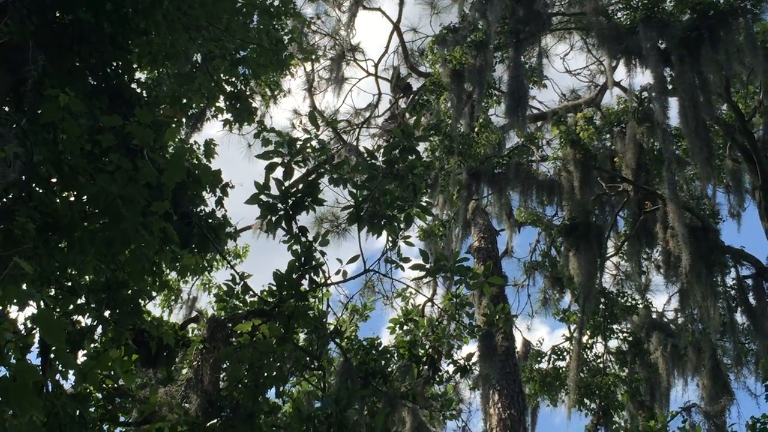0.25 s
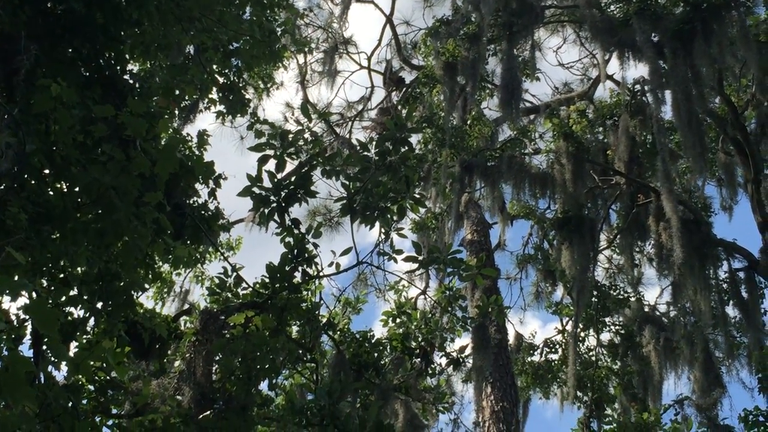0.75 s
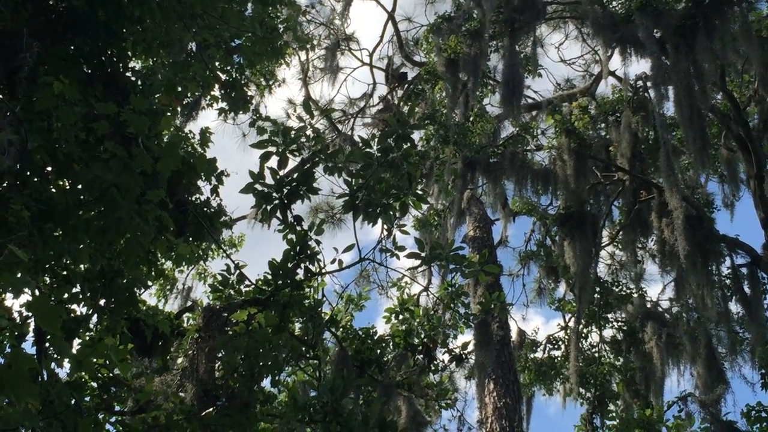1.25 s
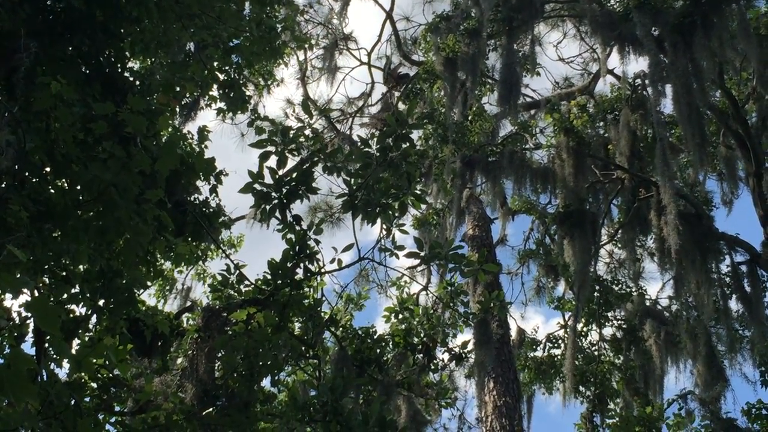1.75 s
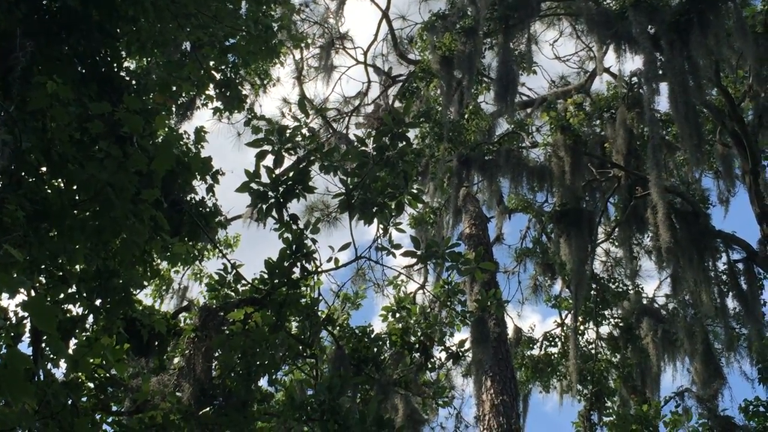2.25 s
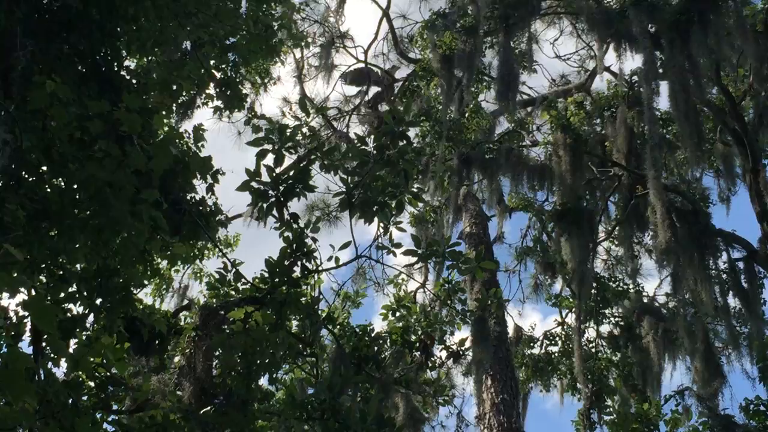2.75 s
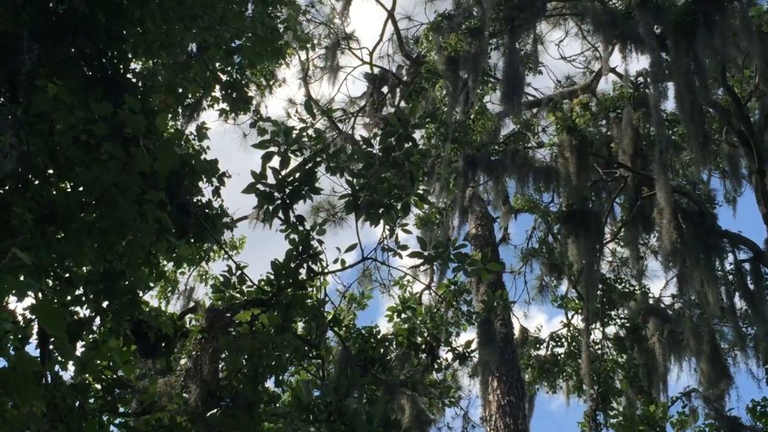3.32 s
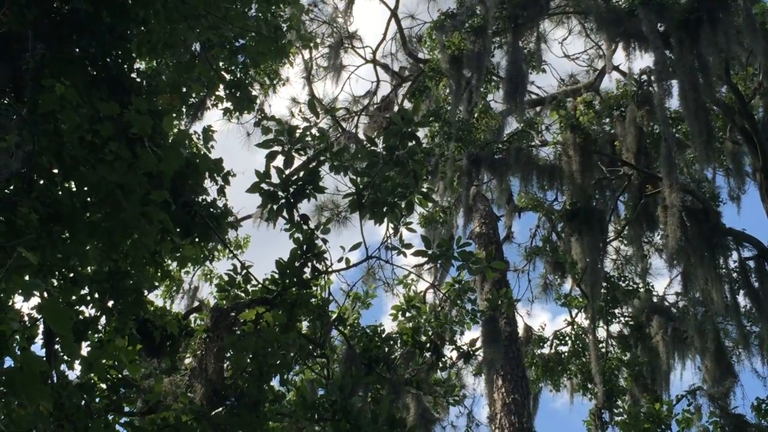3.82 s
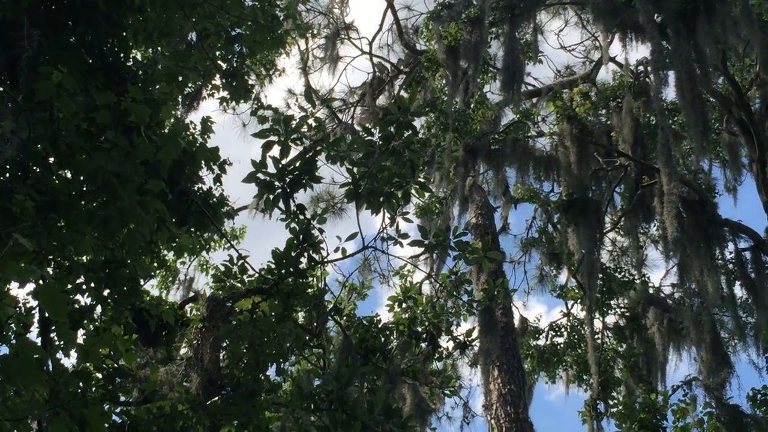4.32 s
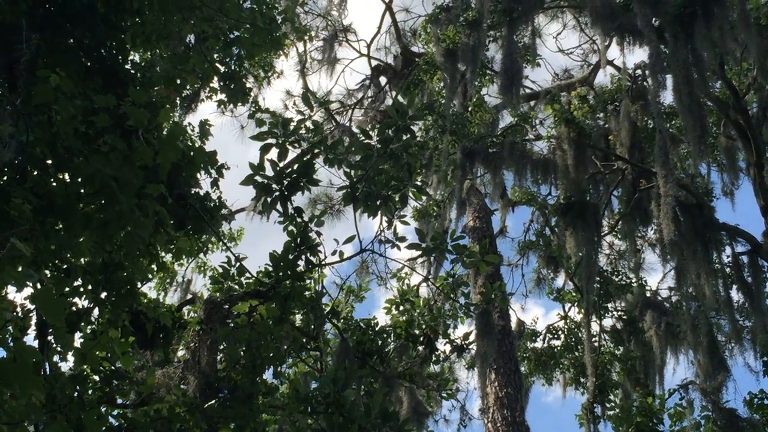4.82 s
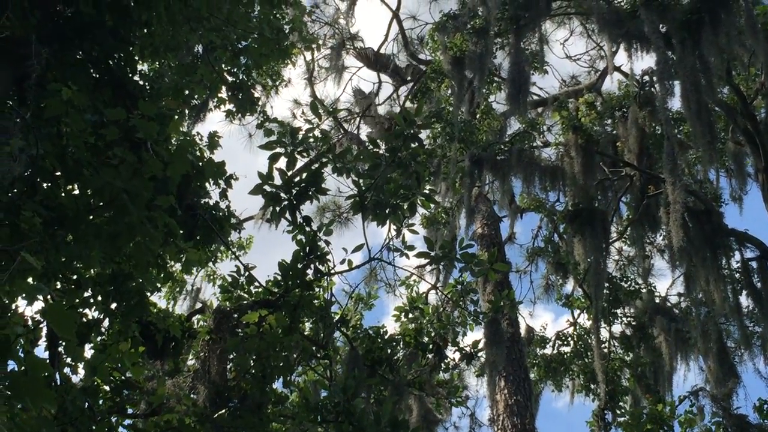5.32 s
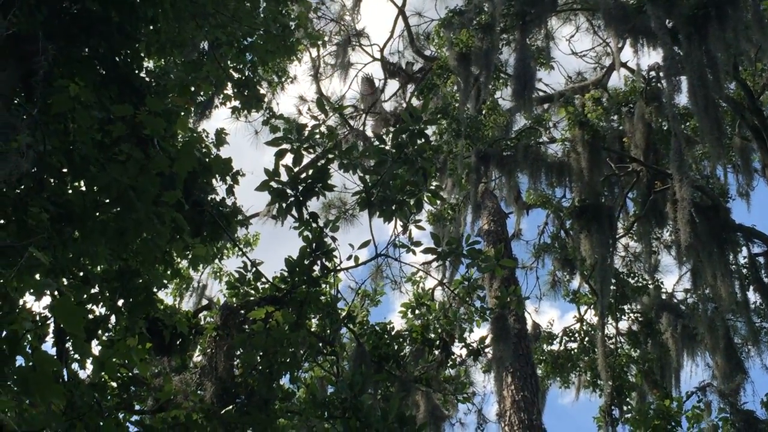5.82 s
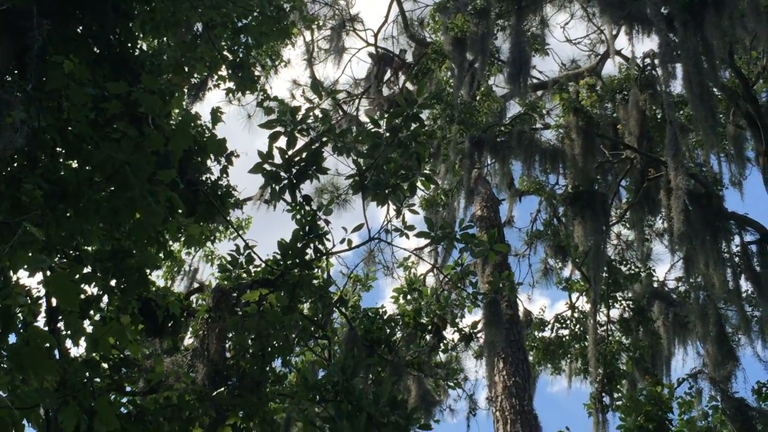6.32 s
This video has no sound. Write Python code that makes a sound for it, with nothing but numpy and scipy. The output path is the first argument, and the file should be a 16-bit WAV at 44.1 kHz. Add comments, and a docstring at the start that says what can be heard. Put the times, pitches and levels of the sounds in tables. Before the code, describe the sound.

Heron chicks beg from a nest high in a pine, heard in mono outdoors. From 0.1 to 1.9 s one chick gives a harsh, rough kek-kek-kek, some eight short bursts a second, strengthening toward the middle, while a softer sibling rasps in between. At 2 s the rattle stops; thin, nearly closed-beak whining rasps follow, quieter, with hollow yelps around 2.6 to 2.75 and 3.0 s. From 3.1 to 4.9 s long hoarse rasps surge and widen into bright hiss, with a strong yelp at 4.0 s. Shorter rasps and faint yelps near 5.3 s lead to a weaker, blurrier kek series from 5.7 s, overlapping hoarse rasps, and a higher, loud yelp at 6.56 s as it cuts off. Faint wing swishes touch leaves after 2 s. Trees add light echoes; beneath lie quiet air, low rumble and, mostly after 4 s, a wavering distant engine hum.

```python
"""A fast harsh "kek-kek-kek" opens, a softer sibling rasp between: heron chicks beg in a nest high in a pine.
It gives way to long hissing rasps and a few hollow yelps, then starts again.
Each voice is rough membrane pulses and air, or a wavering tone and noise, shaped by throat resonances.
Wings brush the foliage as grainy noise and the trees scatter the calls as echoes and a faint tail.
Underneath lie filtered-noise air, a distant rumble and the wavering hum of a far engine."""
import sys
import numpy as np
from scipy import signal
from scipy.fft import rfft, irfft
from scipy.io import wavfile
from scipy.ndimage import uniform_filter1d, map_coordinates

SR = 44100
rng = np.random.default_rng(int(sys.argv[2]) if len(sys.argv) > 2 else 0)


def wrap_up_sound(samples):
    """Save the sound to the file named by the first command line argument, as 16-bit audio."""
    columns = np.atleast_2d(samples).T
    # keep every value between -1 and 1, then stretch to whole-number steps
    tamed = np.clip(columns, -1, 1)
    steps = np.round(tamed * 32767).astype(np.int16)
    wavfile.write(sys.argv[1], SR, steps)


N = 289737
T = np.arange(N) / SR  # time [s]

# one row a kek: (peak time [s], level [dB], rise [s], fall [s], beak resonance [Hz], brightness [dB/octave])
KEK_CALLS = [(0.104, -41, 0.022, 0.036, 1370, -2.5), (0.234, -39.5, 0.023, 0.03, 1380, -0.9),
             (0.38, -40, 0.019, 0.015, 1610, -1.5), (0.499, -36.5, 0.026, 0.018, 3130, -2),
             (0.622, -36, 0.013, 0.025, 1150, 0.5), (0.753, -35.5, 0.022, 0.032, 1220, 0.6),
             (0.884, -34, 0.03, 0.021, 2050.0, 0.9), (1.016, -36.5, 0.029, 0.019, 2070, -1),
             (1.142, -35.5, 0.032, 0.022, 2200, 0.5), (1.259, -36, 0.022, 0.029, 1070, 2),
             (1.399, -36, 0.034, 0.029, 1580, 0.5), (1.513, -35, 0.015, 0.053, 1580, 0.8),
             (1.655, -36, 0.015, 0.029, 1780, -1.5), (1.773, -33.5, 0.0086, 0.024, 1590, 0.5),
             (1.919, -38.5, 0.026, 0.027, 1780, 0.5), (5.728, -43, 0.0055, 0.045, 1120.0, 3),
             (5.839, -37.5, 0.024, 0.034, 1270, 1.5), (5.954, -41, 0.036, 0.025, 1130, 0),
             (6.068, -39.5, 0.036, 0.02, 2600, -2), (6.179, -42, 0.071, 0.11, 1160, -6),
             (6.29, -43, 0.046, 0.013, 2580.0, -4.5), (6.384, -43.5, 0.017, 0.12, 1060, -5),
             (6.507, -43.5, 0.019, 0.028, 1140, 2.5)]
# wide-open throat of the keks, relative gain: (frequency [Hz], gain [dB])
KEK_THROAT_GAIN = [(500, -31), (700, 1.5), (1060, -3), (1300, -1), (1600, -5.5), (2050, 0), (2390, -7),
                   (2650, -1), (3550, -6), (4750, -23.5), (5600, -31), (7700, -43.5), (11000, -48.5)]

# one row a drawn-out rasp: (start [s], end [s], level halfway [dB], growth [dB], lowest resonance at start [Hz],
# at end [Hz], second resonance halfway [Hz], its blur [0-1], beak band at half gape [dB],
# hiss at half gape [dB], gape at start [0-1], gape at end [0-1]); surges add to some of these
RASP_CALLS = [(1.995, 2.051, -49.5, -2.5, 1046, 1070, 2260, .02, -4.5, -32, 0, .05),
              (2.068, 2.173, -52, -6.5, 1130, 1176, 2370, 0.1, -0.5, -23, 0.12, 0.026),
              (2.191, 2.39, -53.5, 5.5, 1050, 1168, 2396, 0.18, -0.5, -30, 0.1, 0.25),
              (2.41, 2.64, -60.5, 1, 1164, 1210, 2310, 0.3, -5.5, -20, 0.37, .25),
              (2.997, 3.098, -60.5, 8, 1020, 976, 2740, .55, -2.5, -25, 0.25, 0.47),
              (3.1, 3.433, -51, -0.5, 1011, 1102, 2460, 0.77, -4.5, -24, .62, 0.69),
              (3.493, 3.662, -48, -2, 968, 1145, 2140, 0.45, -6.5, -27, 0.57, 0.023),
              (3.665, 4.063, -52, 4, 1007, 1166, 2147, 0.12, 0, -14.5, 0.31, 0.37),
              (4.075, 4.324, -53.5, 1.5, 1044, 1066, 2106, 0.08, 0, -19.5, 0.37, 0.74),
              (4.3, 4.66, -53, 6.5, 1070, 1097, 2154, .3, -10.5, -20.5, 0.69, 0.9),
              (4.663, 4.922, -47, 2, 1080, 1097, 2250, 0.7, -6.5, -16.5, 0.8, 0.54),
              (5.016, 5.242, -54, 0.5, 1066, 970, 2650, 0.54, -4.5, -23, 0.2, 0.24),
              (5.318, 5.482, -56, -3.5, 923, 900, 2530, 0.17, -11.5, -28, 0.13, 0.55),
              (5.502, 5.625, -55, 1.5, 880, 977, 2530, 0.2, -5.5, -32, 0.66, 0.35),
              (5.614, 5.896, -51.5, 0.5, 960, 1074, 1970, 0.16, -8, -39, 0.82, 0.78),
              (5.905, 6.033, -44, 0.5, 1060, 1060, 2450, 0.86, -0.5, -16.5, 0.36, 0.4),
              (6.149, 6.574, -48.5, 2.5, 972, 1000, 2190, 0.75, -3.5, -19, 0.64, .15)]
# a chick strains differently within a rasp: (start [s], end [s], extra effort [dB], extra gape [0-1],
# shift of the lowest resonance [Hz])
STRAIN_SURGES = [(2.344, 2.402, -2.5, 0.36, 2), (3.305, 3.394, 11, 0.04, 67), (3.847, 3.889, 3, 0.23, 30),
                 (3.926, 3.98, -1.5, 0.36, -5), (3.98, 4.072, 5, 0.05, -85), (4.177, 4.256, 1, 0.04, -3),
                 (6.28, 6.407, 5.5, 0, -19)]
# the neck stretches and draws back, sliding the upper resonances:
# (time [s], third resonance [Hz], fourth [Hz], fifth [Hz])
NECK_RESONANCES = [(2.0, 3080, 4100, 5300), (2.39, 3490, 4300, 5500), (3.06, 3180, 4020, 5030),
                   (3.38, 3420, 4270, 5540), (3.62, 3100, 4030, 5330), (3.83, 3650, 4500, 5500),
                   (4.04, 3570, 3960, 5540), (4.24, 3480, 4540, 6080), (4.36, 3520, 4380, 5700),
                   (4.48, 3660, 4720, 5750), (4.68, 3614, 4510, 5870), (4.92, 3670, 4500, 4920),
                   (5.1, 3200, 3930, 6100), (5.76, 3064, 3790, 5150), (6.1, 3125, 3980, 4930),
                   (6.57, 3180, 4680, 6200)]

# soft rasps of a sibling: (start [s], end [s], level [dB])
SIBLING_CALLS = [(-.05, -0.005, -44.5), (0.326, 0.45, -52), (0.53, 0.785, -52.5), (0.897, 1.28, -52.5),
                 (1.44, 1.596, -51.5), (1.688, 1.867, -50.5)]
# the sibling's throat resonances before drift: (centre [Hz], width of one filter stage [Hz], relative level [dB])
SIBLING_RESONANCES = [(1033, 490, 9), (1283, 800, 8), (1800, 350, 0.5), (2390, 520, 3.5), (3000, 510, 2.5),
                      (3840, 1300, -3.5), (5980, 1400, -16)]

# hollow yelps: (peak time [s], level [dB], rise before a 1.26 stretch [s], fall [s], pitch at the peak [Hz],
# overtone at the peak [Hz], overtone relative to the pitch [dB], roughness [0-1])
YELP_CALLS = [(2.592, -46, 0.0037, 0.013, 966, 2270, -21, 0.65),
              (2.718, -53.5, .006, 0.018, 960, 1890, -10, 0.4),
              (2.742, -45.5, 0.0078, 0.018, 985, 1954, -8.5, 0.34),
              (2.976, -42.5, 0.025, 0.017, 1009, 3150, -6.5, 0.38),
              (3.993, -40, 0.0079, 0.013, 983, 2160, -21, 0.4),
              (5.281, -51.5, 0.0065, 0.035, 950, 1420, -19, 0),
              (5.324, -49.5, 0.0045, 0.019, 900, 1386, -14, 0.1),
              (6.562, -36.5, 0.012, .03, 1193, 2950, -21, 0.34)]

# wings brushing twigs and leaves: (peak time [s], level [dB], rise [s], fall [s])
WING_BRUSHES = [(2.15, -72, 0.035, .03), (2.999, -55.5, 0.011, 0.016), (3.38, -62.5, 0.07, .06),
                (3.87, -63.5, 0.023, 0.046), (4.323, -62, .006, 0.0065), (4.72, -64, 0.026, 0.055),
                (4.89, -63, 0.075, 0.074), (5.12, -68, 0.069, 0.063), (5.52, -69.5, 0.065, 0.17)]
# colour of the rustling leaves, relative gain: (frequency [Hz], gain [dB])
LEAF_GAIN = [(1500, 7), (3500, 2), (6000, 2), (9000, -2.5), (15000, -15)]

# how long the trees ring: (frequency [Hz], time to fall 60 dB [s])
WOODS_DECAY = [(300, 0.45), (1000, 0.48), (3000, 0.57), (8000, 0.37)]

# colour of the outdoor air, relative gain: (frequency [Hz], gain [dB])
AIR_GAIN = [(20, -43), (40, -15), (65, 2.5), (100, -1), (150, -5), (300, -7.5), (500, -11.5), (1000, -10.5),
            (2000, -15.5), (4500, -25.5), (8000, -29), (10500, -32), (15500, -32.5)]
# distant rumble: (time [s], level before trim and lumps [dB])
RUMBLE_LEVEL = [(0, -70), (.42, -77), (.53, -59), (.7, -63.5), (1.4, -67), (1.65, -73), (3.2, -67.5),
                (4.15, -64.5), (4.9, -67), (6.57, -67.5)]
# hum of a far engine: (time [s], level before wavering [dB])
HUM_LEVEL = [(0, -85), (3.6, -79), (4.1, -65.5), (5.0, -63), (5.7, -64.5), (6.1, -77), (6.57, -65)]

RASP_ATTACK_S, RASP_RELEASE_S = 0.023, 0.023
SURGE_ATTACK_S, SURGE_RELEASE_S = 0.015, 0.02
# what an opening beak does, from shut to wide open
EDGE_SHUT_DB, EDGE_OPENING_DB, BEAK_OPENING_DB, HISS_OPENING_DB = -27.5, 30, 6, 14.5
SPREAD_SHUT_HZ, SPREAD_OPENING_HZ, SPREAD_STRAIN_HZ = 88, 106, 64  # gap between the lowest pair of resonances
STRAIN_DULLING_DB = -3.5  # straining feeds the lowest resonances more than the upper ones
SECOND_GLIDE = 0.57  # how much of the lowest resonance's glide the second follows (exponent)
WHINE_DB, WHINE_WIDTH_HZ = 2, 180  # a relaxed, nearly shut beak narrows the rasp to a whine
EDGE_HZ = 15700  # upper band limit


def keks(beak_db=6, beak_width_hz=300, pulse_hz=235, spit_db=-30):
    """Short rattling bursts through a wide-open throat, each with its own beak resonance."""
    source = syrinx(pulse_hz, jitter=.22, uneven_db=3, air=.6)
    source = windpipe(source, 560 * np.exp(.15 * wander(9)), echo=.45)
    throat = colour(source, lambda hz: read(KEK_THROAT_GAIN, hz))
    drive = band(throat, 853, 11700, order=4)
    spit = steady(formant(source, 5750, 1300))
    out = np.zeros(N)
    for s, db, rise, fall, beak_hz, bright in KEK_CALLS:
        def beak_gain(hz):
            """A beak peak on a spectral tilt, in dB."""
            peak = beak_db / (1 + ((hz - beak_hz) / beak_width_hz) ** 2)
            return peak + bright * np.log2(np.clip(hz, 900, 3800) / beak_hz)

        near = (T > s - .1) & (T < s + .2)
        voice = steady(colour(drive[near], beak_gain))
        force = swell(T[near] - s, rise, fall)
        # spit carries force twice, so it shows mainly at full force; brighter keks spit more
        out[near] += amp(db) * force * (voice + amp(spit_db + bright) * force * spit[near])
    return out


def rasp(flutter_db=1, croak_db=-3, pulse_hz=300):
    """A hoarse hiss through gliding resonances; effort adds a croak underneath, an open beak brightens it."""
    effort, first, second, blur, beak, hiss, gape = gestures()
    third, fourth, fifth = curves(NECK_RESONANCES)
    source = syrinx(pulse_hz, jitter=.3, uneven_db=3, air=.7)
    drive = windpipe(source, third / 7 * (1 + .025 * wander(12)), echo=.58)
    strain = np.clip((effort + 52) / 12, 0, 1)  # starts at -52 dB, full at -40 dB

    # lowest pair of resonances, with whine and croak
    spread = SPREAD_SHUT_HZ + SPREAD_OPENING_HZ * gape + SPREAD_STRAIN_HZ * strain
    pair = formant(source, first - spread / 2, 276) + 0.88 * formant(drive, first + spread / 2, 418)
    whine = amp(WHINE_DB) * (1 - gape) * (1 - strain) * formant(source, first, WHINE_WIDTH_HZ)
    croak = amp(croak_db) * strain * formant(source, 824, 210)
    low = steady(pair + whine + croak)

    # beak band: clear or blurred, with a lower companion as the beak opens
    clear = formant(source, second, 420)
    blurred = unit(band(resonate(drive, second, 3000), 2080, 3240, order=4))
    companion = formant(source, 0.7925 * second, 440)
    middle = steady((1 - blur) * clear + blur * blurred + 0.55 * gape * companion)

    # bright edge and hiss
    upper = steady(formant(drive, third, 1020) + .5 * formant(source, fourth, 610))
    wide_hiss = unit(band(formant(drive, fifth, 4940), 2200, 14000))
    top = steady(0.85 * formant(source, fifth, 640) + wide_hiss)

    overtones = ((middle, beak + BEAK_OPENING_DB * (gape - .5)),
                 (upper, EDGE_SHUT_DB + EDGE_OPENING_DB * gape),
                 (top, hiss + HISS_OPENING_DB * (gape - .5)))
    bright = sum(part * amp(db + flutter_db * wander(32) / 2) for part, db in overtones)
    voice = low + amp(STRAIN_DULLING_DB * strain) * bright
    return voice * amp(effort + flutter_db * wander(30))


def gestures():
    """Each rasp grows, glides and moves the beak evenly; the throat blends smoothly from rasp to rasp."""
    power, weights, shape = 0, 0, 0
    for (start, end, db, growth_db, from_hz, to_hz, second, blur, beak, hiss,
         gape_from, gape_to) in RASP_CALLS:
        along = np.clip((T - start) / (end - start), 0, 1)
        weight = hold(start, end, RASP_ATTACK_S, RASP_RELEASE_S) ** 2 + 1e-20
        first = from_hz + (to_hz - from_hz) * along
        glide = (2 * first / (from_hz + to_hz)) ** SECOND_GLIDE
        gape = gape_from + (gape_to - gape_from) * along
        power = power + weight * amp(db + growth_db * (along - .5)) ** 2
        pose = first, second * glide, blur, beak, hiss, gape
        shape = shape + np.array([weight * p for p in pose])
        weights = weights + weight
    effort = 10 * np.log10(power)
    first, second, blur, beak, hiss, gape = shape / weights
    for start, end, extra_db, wider, shift_hz in STRAIN_SURGES:
        push = hold(start, end, SURGE_ATTACK_S, SURGE_RELEASE_S)
        effort = effort + extra_db * push
        first = first + shift_hz * push
        gape = gape + wider * push
        blur = blur + wider * push / 2
    return effort, first, second, np.clip(blur, 0, 1), beak, hiss, np.clip(gape, 0, 1)


def sibling(attack_s=0.014, release_s=0.019):
    """A softer rasp: rough pulses and air through throat resonances that drift together."""
    drive = syrinx(pulse_hz=296.0, jitter=.3, uneven_db=3, air=0.9)
    drift = 1 + 0.042 * wander(4)
    voice = sum(amp(db) * formant(drive, hz * drift, width, flutter_db=3)
                for hz, width, db in SIBLING_RESONANCES)
    level = sum(amp(db) * hold(start, end, attack_s, release_s) for start, end, db in SIBLING_CALLS)
    return steady(voice) * level


def yelps(waver=0.0249, width_hz=750, sag=.6):
    """A wavering, sagging note with one strong overtone, edged with hoarse noise."""
    out = np.zeros(N)
    bend = waver * wander(93.8)
    air = rng.standard_normal(N)
    for s, db, rise, fall, hz, over_hz, over_db, rough in YELP_CALLS:
        opening = np.clip((T - s + 1.55 * rise) / 0.0044, 0, 1)  # the note catches abruptly
        envelope = opening * swell(T - s, 1.26 * rise, fall)
        glide = hz * (bend - sag * np.clip(T - s, -.1, .1))  # same shift in Hz for note and overtone
        for f, gain in ((hz, 1), (over_hz, amp(over_db))):
            line = np.sqrt(2) * np.sin(2 * np.pi * np.cumsum(f + glide) / SR)
            hoarse = unit(resonate(air, f, width_hz, order=4))
            out += amp(db) * gain * unit((1 - rough) * line + rough * hoarse) * envelope
    return out


def wings():
    """Feathers sweep over leaves in grainy swishes: noise with a fast random level, coloured."""
    grains = rng.standard_normal(N) * amp(3.5 * wander(550))
    rustle = unit(colour(grains, lambda hz: read(LEAF_GAIN, hz)))
    return rustle * sum(amp(db) * swell(T - s, rise, fall) for s, db, rise, fall in WING_BRUSHES)


def woods(x, wet_db=-17, twigs_db=-9):
    """Near branches give a few quick echoes, the trees around a faint tail that decays by frequency."""
    t = np.arange(SR // 2) / SR
    taps = rng.standard_normal(len(t)) * (rng.random(len(t)) < 2000 / SR) * (t > .012)
    hz, s, z = signal.stft(taps, SR, nperseg=256)
    decay = amp(-60 * s / read(WOODS_DECAY, hz)[:, None])
    tail = signal.istft(z * decay, SR, nperseg=256)[1]
    echo = amp(wet_db) * tail / np.linalg.norm(tail)
    at = rng.uniform(0.001955, .014, size=8)  # branch delays [s]
    echo[(at * SR).astype(int)] += amp(twigs_db) * rng.choice([-1, 1], len(at)) / np.sqrt(len(at))
    return x + signal.fftconvolve(x, echo)[:N]


def background(air_db=-66, rumble_db=-1, lumps_db=2):
    """Still outdoor air and a lumpy low rumble from filtered noise; a far engine as a wavering sine."""
    air = amp(air_db) * unit(colour(rng.standard_normal(N), lambda hz: read(AIR_GAIN, hz)))
    rumble_level = amp(curves(RUMBLE_LEVEL)[0] + rumble_db + lumps_db * wander(28))
    rumble = rumble_level * unit(band(rng.standard_normal(N), 50.7, 90, order=2))
    hum = np.sqrt(2) * np.sin(2 * np.pi * np.cumsum(98 + 0.9 * wander(5.9)) / SR)
    return air + rumble + hum * amp(curves(HUM_LEVEL)[0] + 2 * wander(4.2))


def syrinx(pulse_hz, jitter, uneven_db, air):
    """Irregular slaps of the membranes, mixed with turbulent air."""
    turns = np.cumsum(pulse_hz * np.exp(jitter * wander(pulse_hz / 2))) / SR
    strength = amp(uneven_db * np.clip(rng.standard_normal(N), -2, 1))
    slaps = np.diff(np.floor(turns), prepend=0) * strength  # one slap per whole turn
    return unit(air * rng.standard_normal(N) - unit(slaps))


def windpipe(x, spacing_hz, echo):
    """Sound runs up and down the long neck: a ladder of resonances that slides as it stretches."""
    trip, at = SR / spacing_hz, np.arange(N)  # round trip [samples]
    echo = np.clip(echo, 0, .8)
    return unit(sum(echo ** k * map_coordinates(x, [at - k * trip], order=3) for k in range(4)))


def formant(drive, hz, width_hz, flutter_db=2):
    """One steep throat resonance that quivers in pitch and strength."""
    ring = resonate(drive, hz * (1 + .014 * wander(22)), width_hz, order=5)
    return unit(ring * amp(flutter_db * wander(18)))


def resonate(x, hz, width_hz, order=2):
    """A steep resonance of gain 1 that follows hz; width_hz is that of one filter stage."""
    turn = np.exp(2j * np.pi * np.cumsum(hz * np.ones(N)) / SR)
    r = np.exp(-np.pi * width_hz / SR)
    z = x / turn  # shift hz down to zero, smooth there, shift back
    for _ in range(order):
        z = signal.lfilter([1 - r], [1, -r], z)
    return 2 * (turn * z).real


def swell(t, rise, fall):
    """A rounded rise from a firm start to t = 0, then an exponential fall."""
    return np.exp(-np.where(t < 0, abs(t / rise) ** 2.5, t / fall))


def hold(start, end, attack_s, release_s):
    """Smooth attack, level hold, exponential release."""
    rise = np.sin(np.pi / 2 * np.clip((T - start) / attack_s, 0, 1))
    return rise * np.exp(-np.clip((T - end) / release_s, 0, 20))


def steady(x):
    """Holds the rms at 1 over some 30 ms, keeping the faster grain."""
    return x / np.sqrt(uniform_filter1d(x ** 2, size=1400) + 1e-20)


def wander(hz):
    """Slow random curve of rms 1, from noise smoothed above about hz."""
    smoothing = np.exp(-(np.fft.rfftfreq(N, 1 / SR) / hz) ** 2)
    return unit(irfft(rfft(rng.standard_normal(N)) * smoothing, N))


def colour(x, gain_db):
    """Causal minimum-phase filter with the gain gain_db(hz)."""
    hz = abs(np.fft.fftfreq(4096, 1 / SR))
    log_gain = np.log(amp(np.maximum(gain_db(hz), -90)))
    taps = np.fft.ifft(np.exp(np.conj(signal.hilbert(log_gain)))).real
    return signal.oaconvolve(x, taps[:len(taps) // 2])[:len(x)]


def band(x, lo_hz, hi_hz, order=3):
    """Band-pass."""
    edges = [lo_hz, min(hi_hz, SR / 2 - 1)]
    return signal.sosfilt(signal.butter(order, edges, "band", fs=SR, output="sos"), x)


def read(points, hz):
    """Reads a spectrum table on a log-frequency axis."""
    f, value = np.transpose(points)
    return np.interp(np.log(hz + 1), np.log(f + 1), value)


def curves(rows):
    """Each column of a table after the time, sample by sample."""
    s, *columns = np.transpose(rows)
    return [np.interp(T, s, c) for c in columns]


def amp(db):
    """Decibels to gain."""
    return 10 ** (np.asarray(db) / 20)


def unit(x):
    """Scales to rms 1."""
    return x / np.sqrt(np.mean(x ** 2) + 1e-20)


def scene():
    """Chicks and wings scattered by the trees, over the background; one channel."""
    nest = keks() + rasp() + sibling() + yelps() + wings()
    return (woods(nest) + background())[None]


def record(dry):
    """The recorder's band limit, after 2 ms fades at both ends."""
    edges = np.clip(np.minimum(T, T[-1] - T) / .002, 0, 1)
    low_pass = signal.firwin(511, EDGE_HZ, window=("kaiser", 9), fs=SR)
    return signal.oaconvolve(dry * edges, low_pass[None], "same")


dry = scene()
out = record(dry)
wrap_up_sound(out)
```